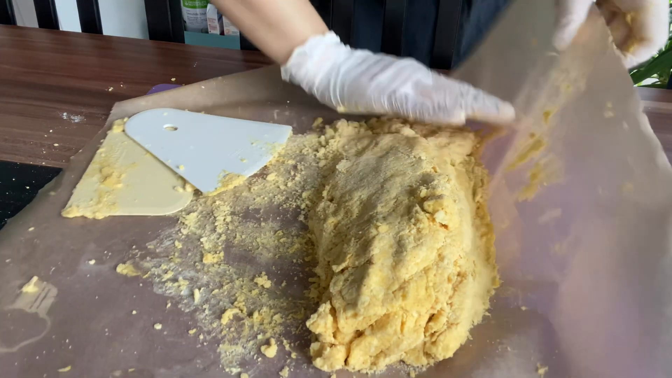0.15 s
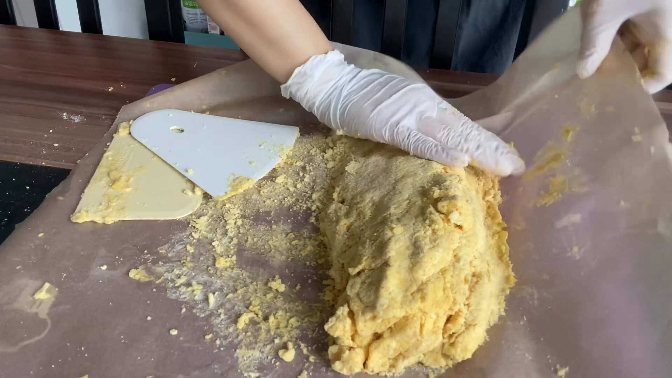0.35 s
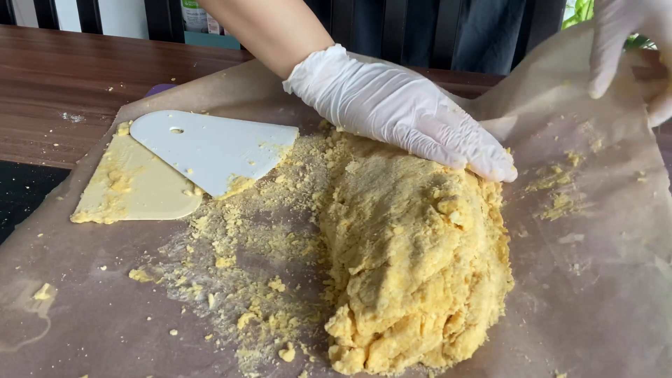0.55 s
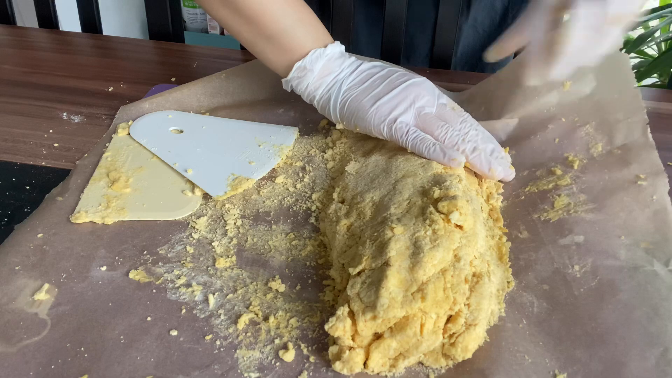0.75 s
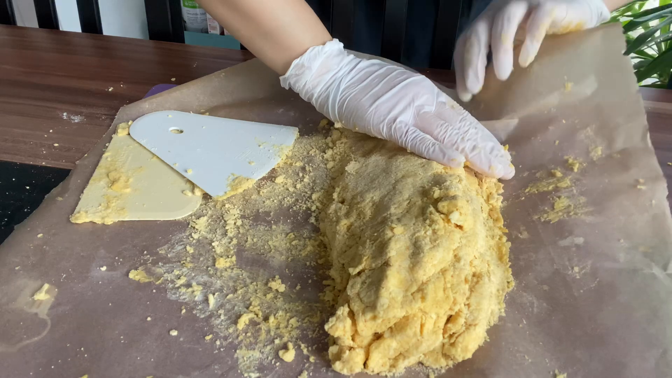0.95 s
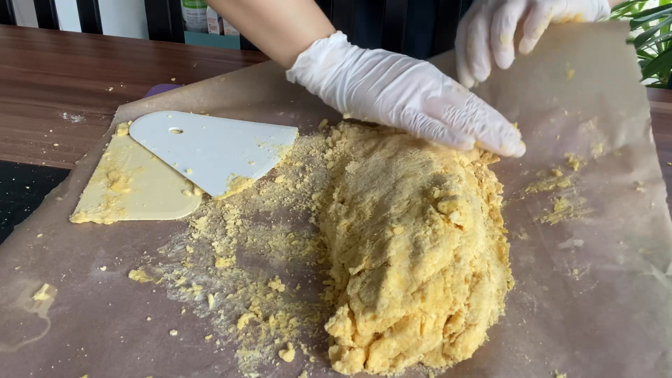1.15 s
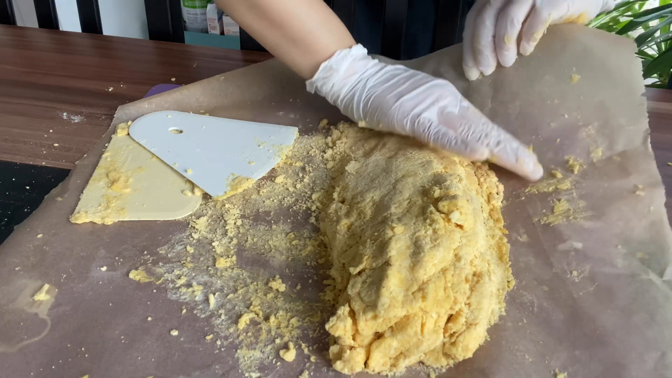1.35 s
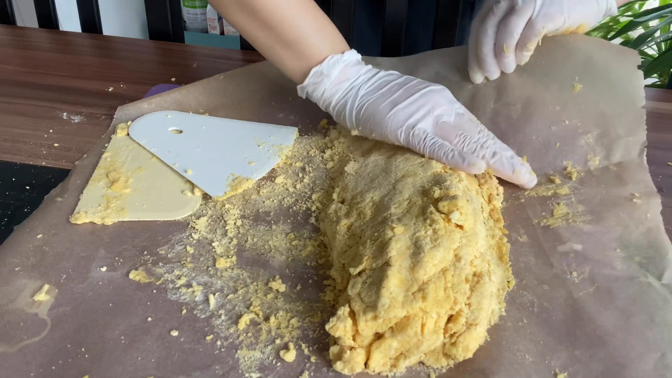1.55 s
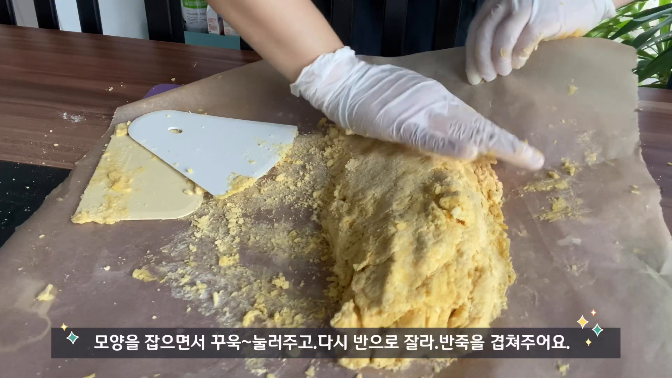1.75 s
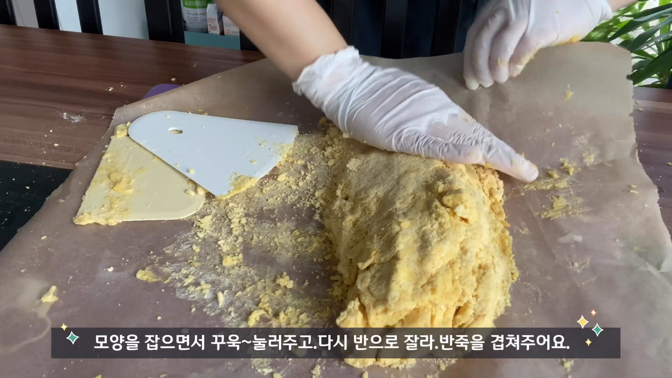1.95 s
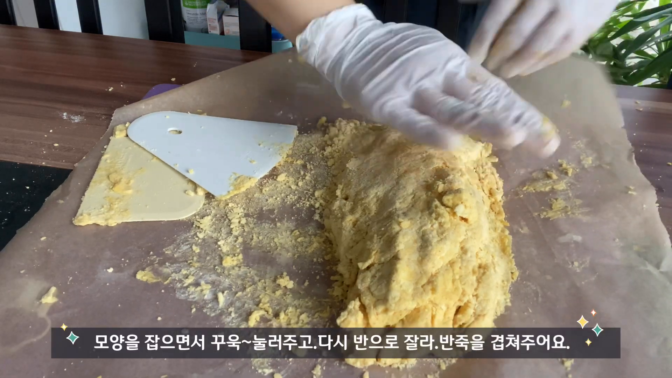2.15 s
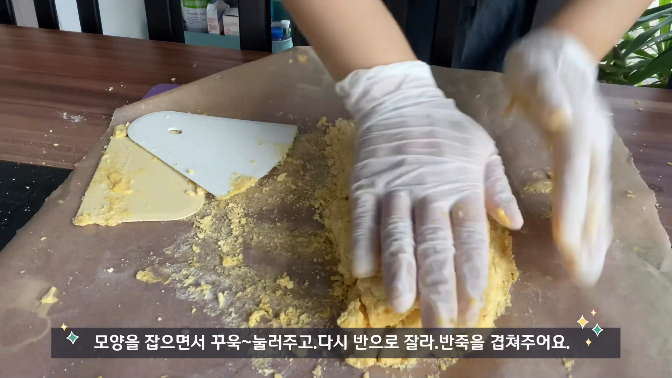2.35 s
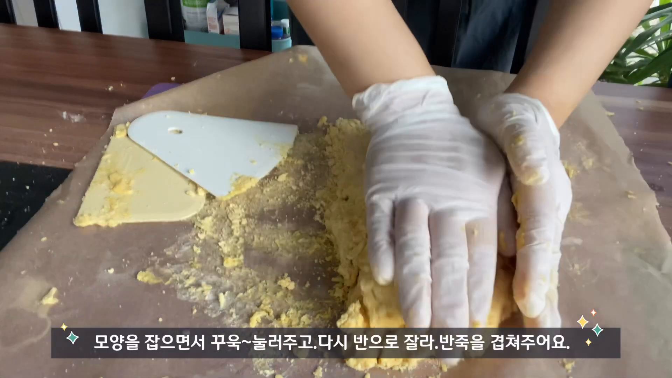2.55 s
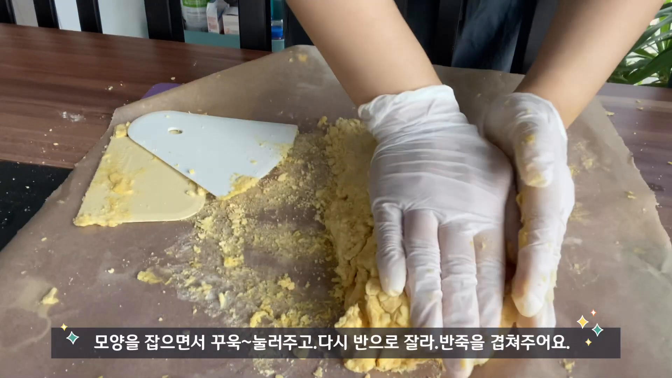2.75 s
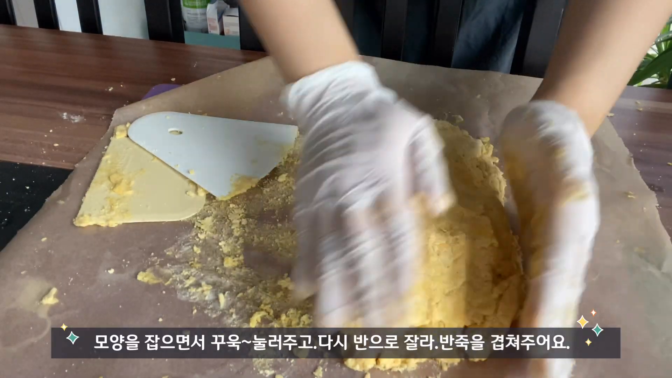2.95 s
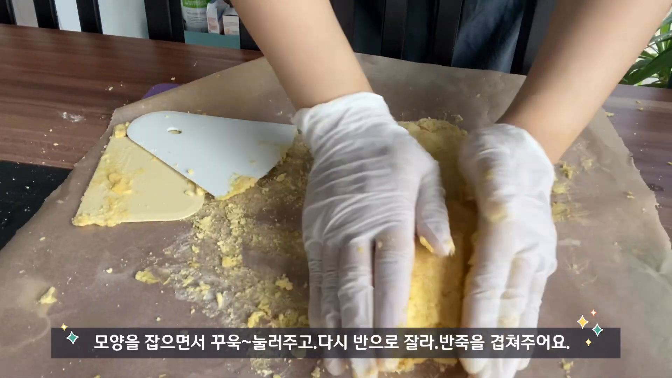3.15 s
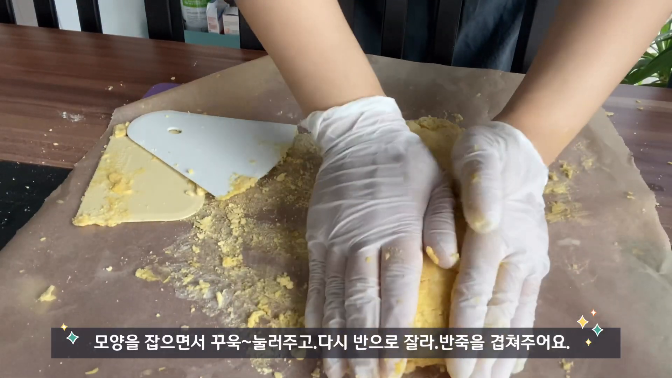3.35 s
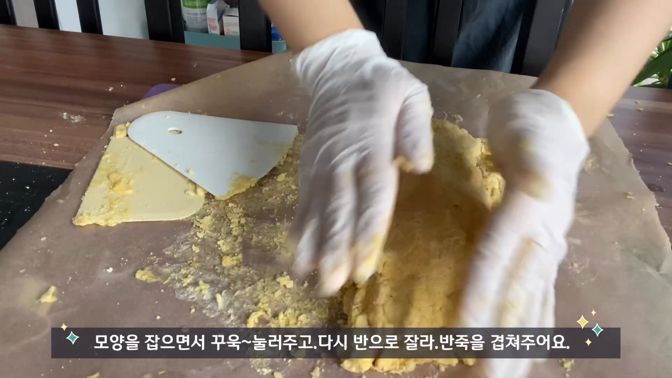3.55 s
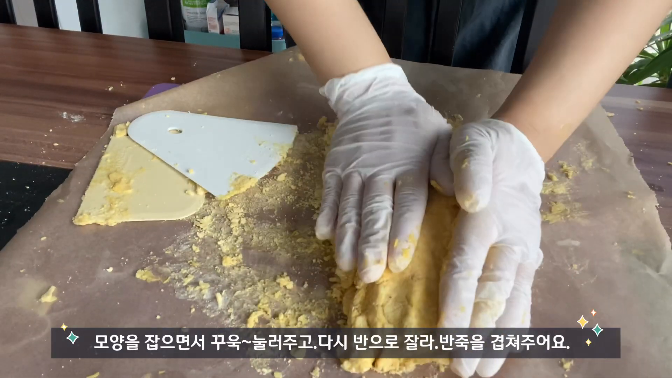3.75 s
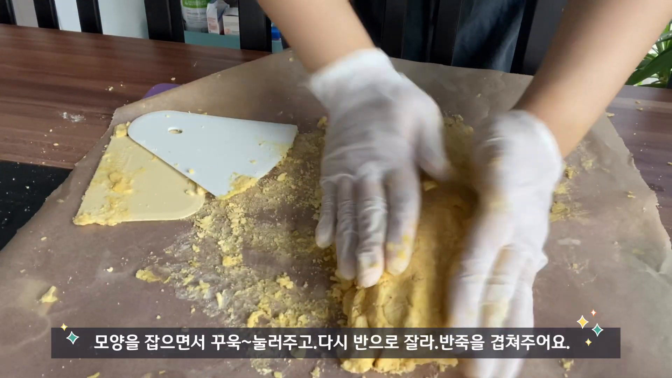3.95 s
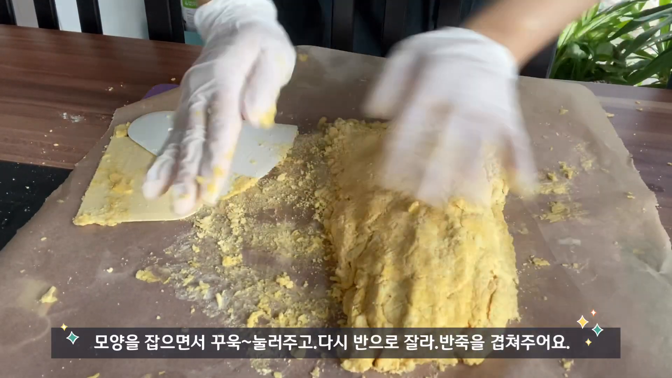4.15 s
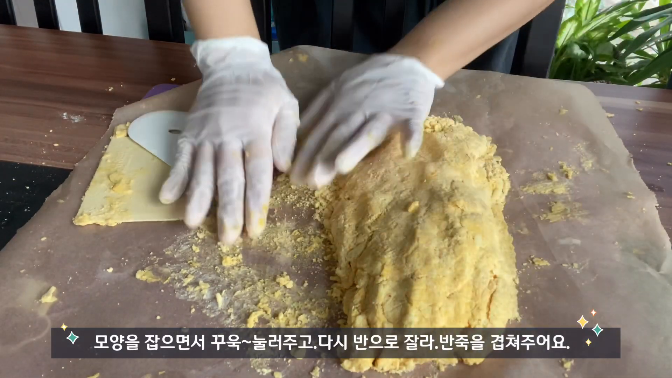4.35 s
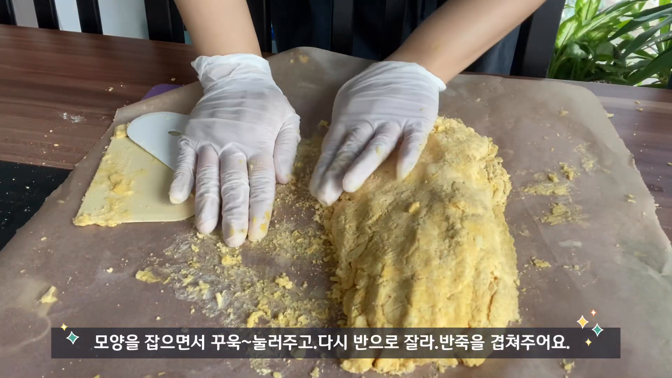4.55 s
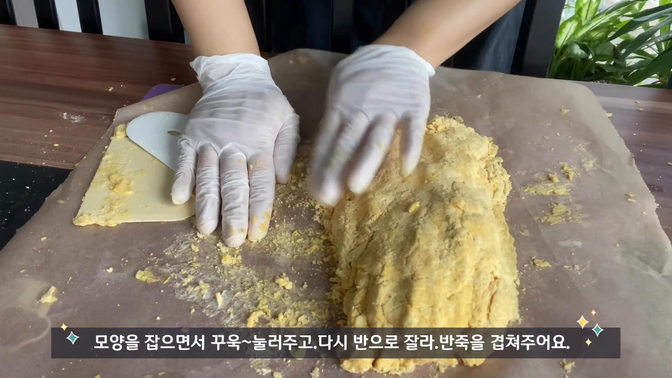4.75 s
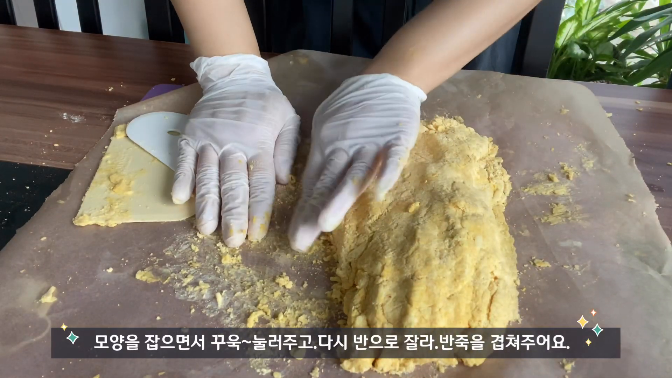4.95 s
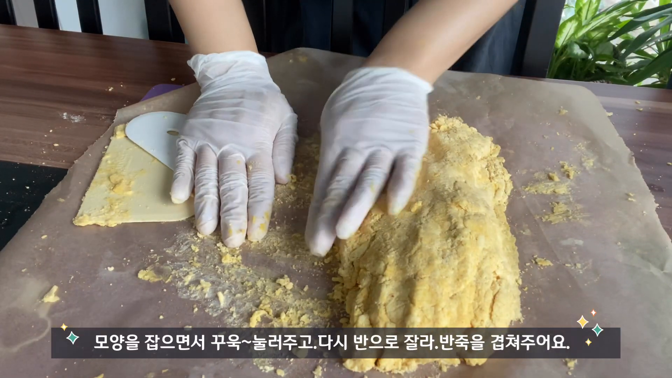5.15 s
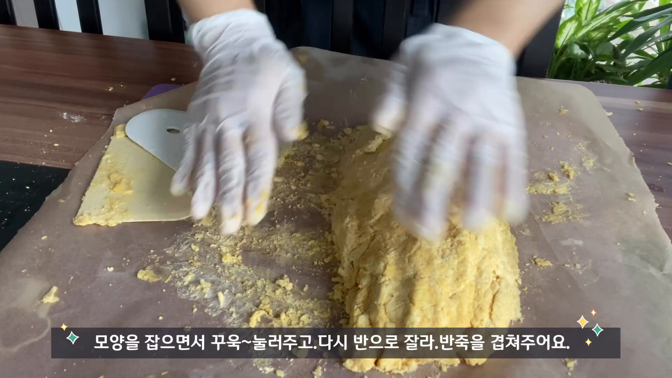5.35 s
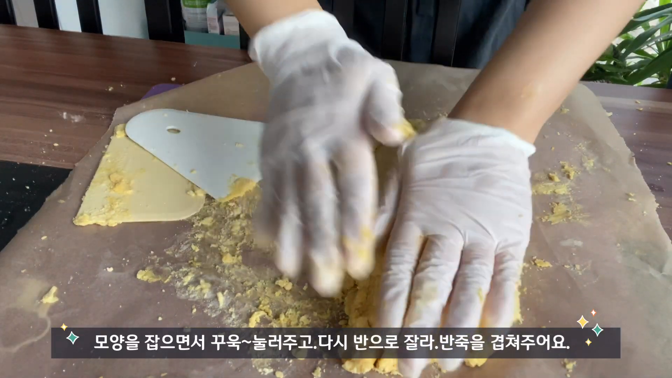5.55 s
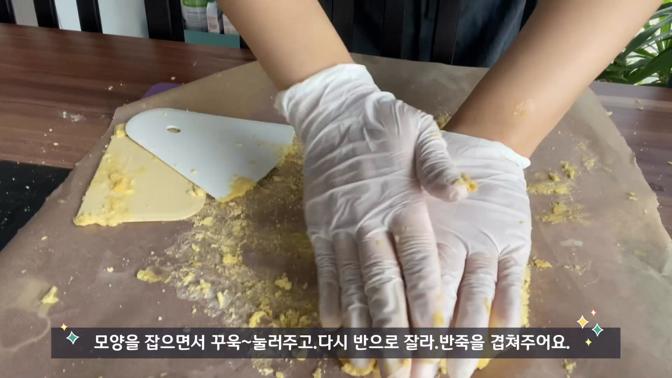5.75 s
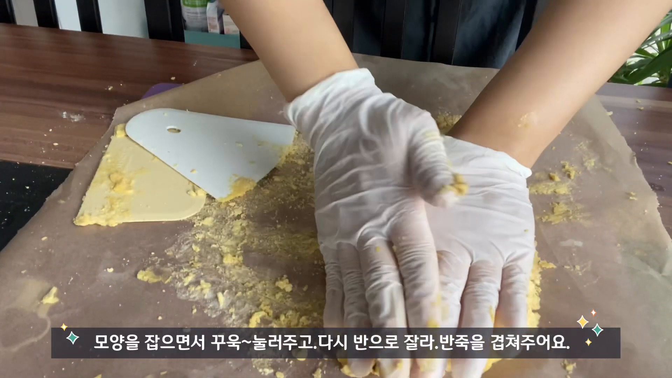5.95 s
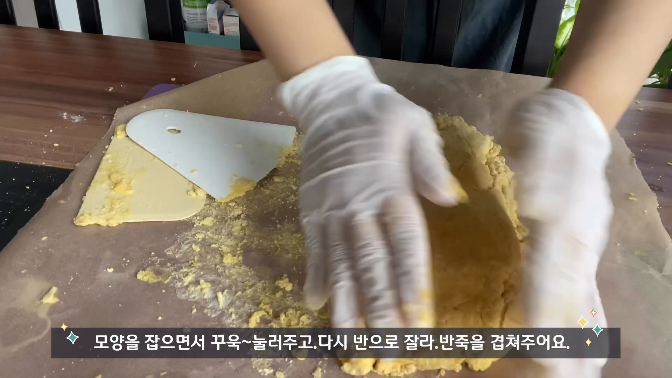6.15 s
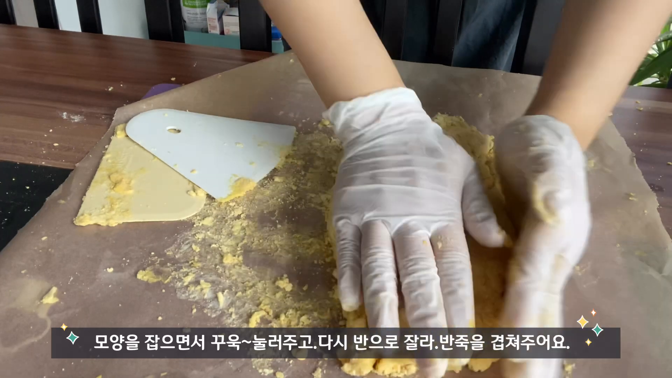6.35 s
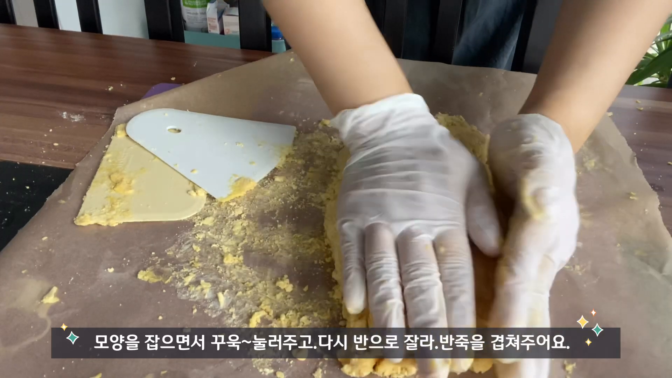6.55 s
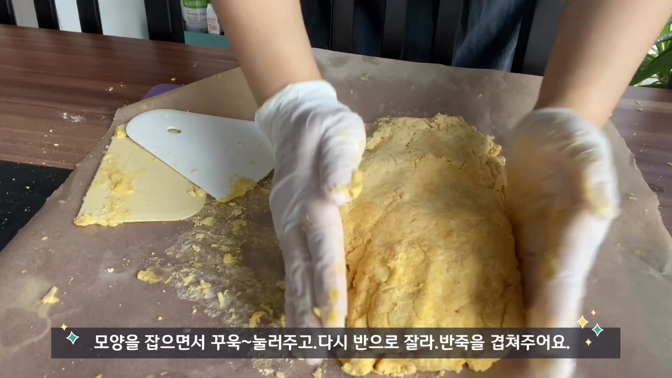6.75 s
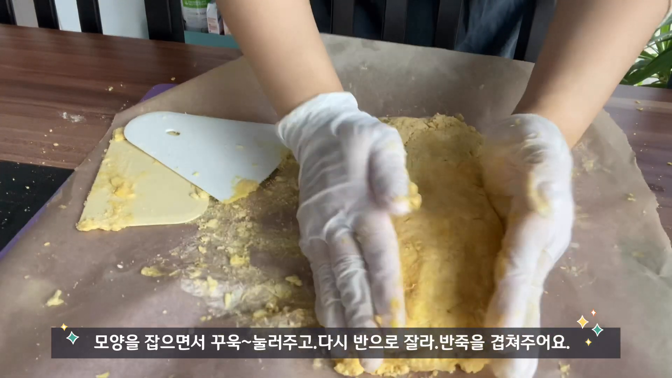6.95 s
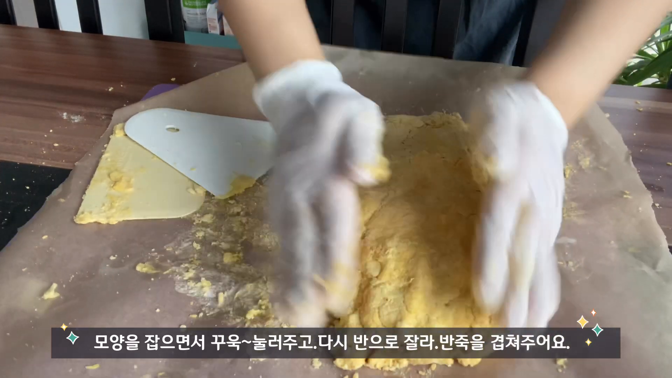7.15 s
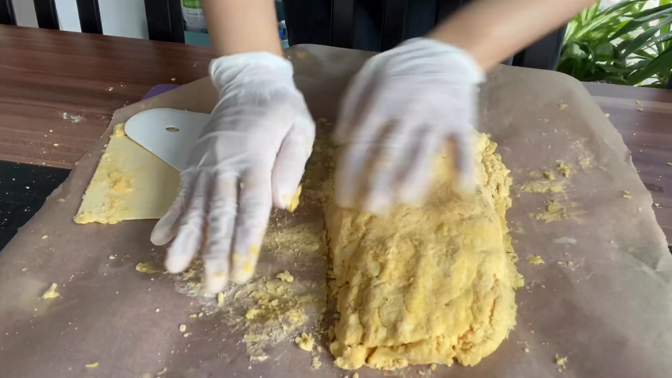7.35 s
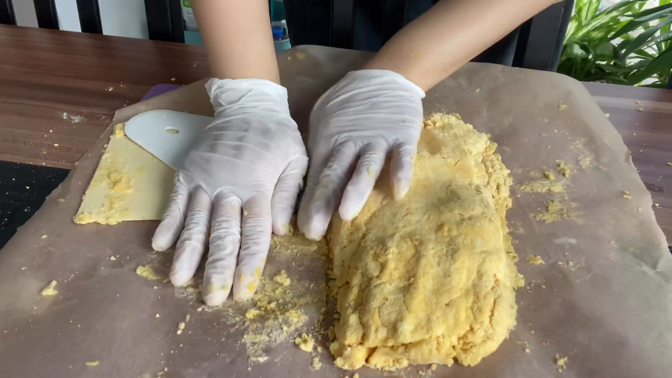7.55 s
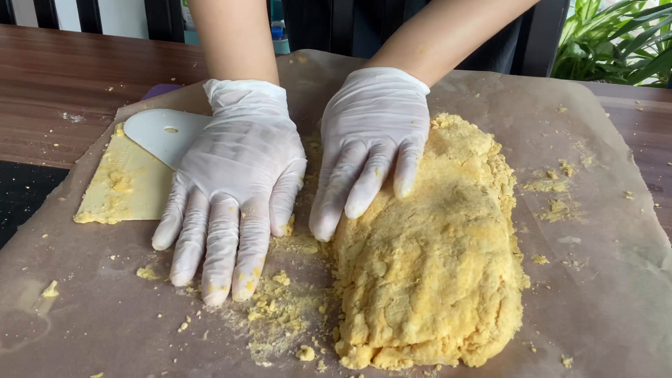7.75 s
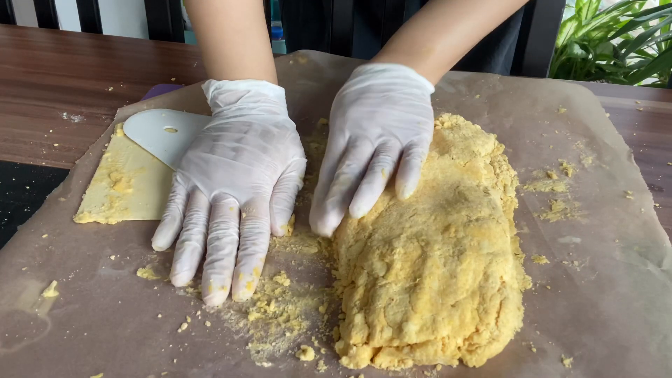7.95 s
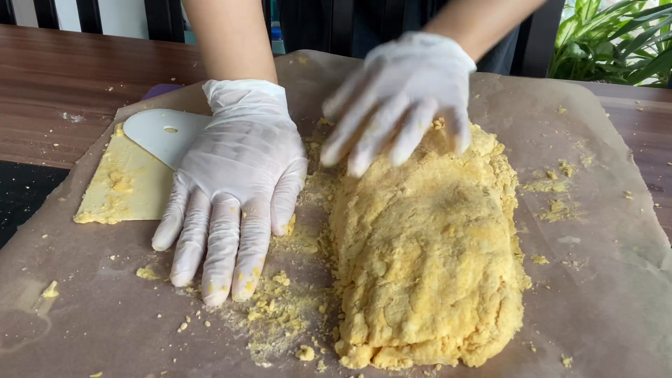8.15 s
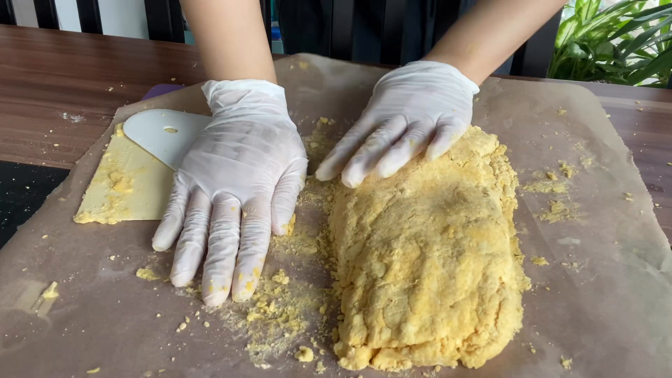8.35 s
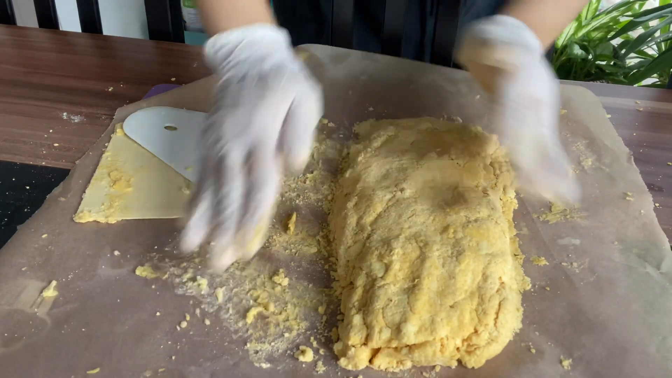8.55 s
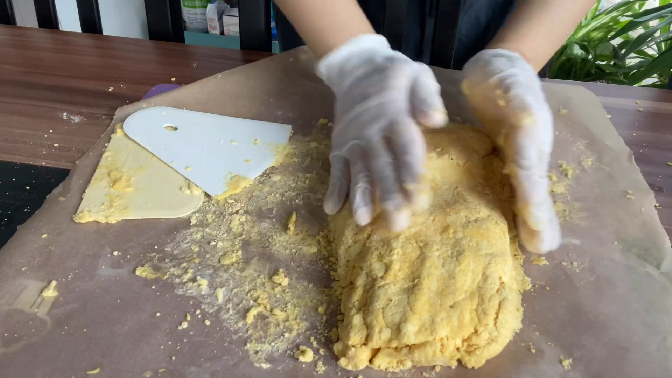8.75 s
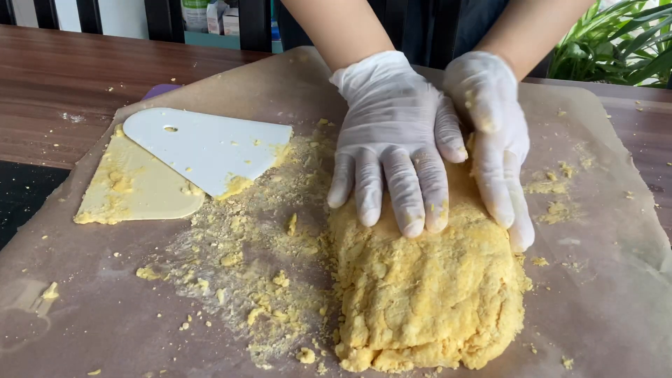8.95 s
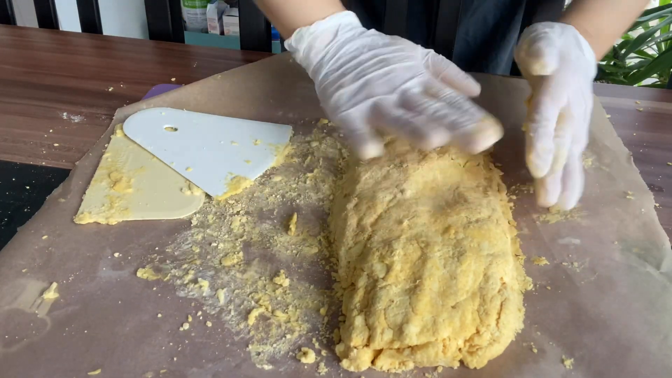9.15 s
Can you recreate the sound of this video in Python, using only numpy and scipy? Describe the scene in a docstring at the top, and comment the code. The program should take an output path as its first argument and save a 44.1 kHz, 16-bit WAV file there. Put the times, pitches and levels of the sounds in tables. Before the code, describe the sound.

Gloved hands handle crisp paper on a kitchen worktop, recorded close with a phone. The opening two seconds are busy and loud, full of crinkles and buckling cracks over dull pushes. Afterwards come separate, softer, brighter rubs and tiny clicks with gentle thumps, interrupted by a few sharp crackles late on. Faint fan rumble with wavering low tones continues throughout, and the room adds a short diffuse reverberation.

```python
"""A dense papery rustle broken by loud snaps: gloved hands lift and smooth baking paper on a kitchen worktop.
Buckling creases are sums of tiny band-passed clicks; a table of swells and fades sets the rustle level.
Soft pushes on the worktop add low thuds as short decaying swings, and hard walls add a diffuse tail.
Behind them a fan gives shaped noise and wandering tones; a phone picks it all up at two ports."""
import sys
import numpy as np
from scipy import signal
from scipy.fft import rfft, irfft, next_fast_len
from scipy.io import wavfile
from scipy.ndimage import uniform_filter1d

SR = 44100
rng = np.random.default_rng(int(sys.argv[2]) if len(sys.argv) > 2 else 0)


def int16_out(signal):
    """Quantize to a 16-bit WAV file."""
    q = np.round(np.clip(np.atleast_2d(signal).T, -1, 1) * 32767)
    wavfile.write(sys.argv[1], SR, q.astype(np.int16))


N = 405279

# colour of the rustle, fuller for the lifted sheet, thinner for gloves:
# [t/s, body under 3.8 kHz/dB, sheen over 5.5 kHz/dB], both weighted by frequency
RUSTLE_COLOUR = [(0, -1, -9), (.8, 3.5, 0.5), (1.5, 2.5, -10.5), (2.05, 1, -8.5), (2.4, -9.5, -1.5),
                 (3.4, -4, -4.5), (4.2, -5.5, -5.5), (4.5, 1.5, -9), (5.2, -0.5, -7.5), (6.0, -5, -7),
                 (6.5, -5, -4.5), (6.82, -6, -7.5), (7.3, 0.5, -5), (7.55, -6, -5.5), (8.02, 9, -12),
                 (8.11, 19.5, -28), (8.2, 1, -13), (8.7, -1, -2.5), (9.2, 1, -2.5)]


def rustle(per_s=6000, scatter_db=2.5, flurry_db=2.0):
    """Crackling noise: a dense random train of small cracks, a few larger, coming in flurries."""
    time_draw, sign_draw, size_draw = rng.random((int(per_s * N / SR), 3)).T
    s = time_draw * N / SR
    db = stir_db(s)
    flurry = (walk(45) + walk(160))[(s * SR).astype(int)]
    large_db = np.minimum(-scatter_db * np.log(size_draw), 12.0)
    size = np.sign(sign_draw - .5) * undb(db + flurry_db * flurry + large_db)
    body_db, sheen_db = curve(RUSTLE_COLOUR, s)
    return cracks(s, size, body_db, sheen_db, 0.56, spread=4.4, colour_db=4.0)


def stir_db(s):
    """Energy addition: swells, fades and a settling tail after each peak sum as powers to one rustle level."""
    # swells and fades of the rustle; a long rub may take two rows:
    # [loudest t/s, level/dB, swell over 20 dB/s, fade over 20 dB/s]
    swells = [(0.0, -27, .1, 0.094), (.16, -34, 0.46, 0.33), (0.322, -35.5, 0.021, 0.07),
              (0.489, -40, 0.49, 0.057), (.68, -49.5, 0.096, 0.021), (.78, -53, 0.027, 0.07),
              (.935, -42.5, 0.036, 0.63), (1.121, -29.5, 0.053, 0.077), (1.28, -38, 0.37, 0.11),
              (1.409, -38, 0.05, 0.18), (1.64, -53, 0.16, 0.89), (1.739, -43, 0.058, 0.18),
              (1.986, -37, 0.082, 0.11), (2.19, -57.5, 0.99, 0.03), (2.335, -42.5, 0.013, 0.3),
              (2.68, -56, 0.015, 0.032), (2.799, -52.5, 0.17, 0.12), (2.967, -46.5, 0.067, 0.3),
              (3.16, -49.5, 0.18, 0.029), (3.36, -54, 0.1, 0.63), (3.45, -54, 0.12, 0.058),
              (3.52, -62, .2, 0.21), (3.96, -45.5, 0.059, 0.061), (4.29, -42.5, 0.0059, 0.23),
              (4.45, -48, 0.07, 0.071), (4.648, -47, 0.045, 0.077), (4.98, -53.5, 0.14, 0.15),
              (5.209, -50, 0.15, 0.055), (5.45, -57, 0.048, 0.069), (5.75, -58.5, 0.45, 0.52),
              (6.03, -55.5, 0.08, 0.041), (6.18, -50.5, 0.014, 0.11), (6.24, -44, 0.06, 0.14),
              (6.57, -50, 0.087, 0.04), (6.818, -35, 0.069, 0.13), (7.05, -46.5, 0.048, 0.15),
              (7.359, -47.5, 0.015, 0.13), (7.559, -39, 0.072, 0.077), (7.639, -60, .1, 0.26),
              (8.1, -69, 0.022, 0.19), (8.228, -43.5, 0.046, 0.1), (8.44, -52.5, 0.32, 0.071),
              (8.672, -50, 0.042, 0.24), (8.78, -58.5, 0.61, 0.13), (9.01, -60, 0.095, 0.048), ]
    settle_db, settle_s = -19, 0.36  # paper settling: level under the row's peak, time to fade 20 dB
    t = np.arange(0, N / SR + .01, .002)
    at, db, swell, fade = np.transpose(swells)[:, :, None]
    late = t - at
    stroke = undb(db - 20 * np.where(late < 0, -late / swell, late / fade))
    settle = (late > 0) * undb(db + settle_db - 20 * late / settle_s)
    power = np.sum(stroke ** 2 + settle ** 2, axis=0)
    return np.interp(s, t, 10 * np.log10(power))


def snaps(table, t60=.017, count=110, lead_s=.003, lead_db=22, give_db=-0.5, swarm_db=-8.0, thin_db=-4):
    """Buckling avalanche: a fold creaks up for a moment, gives way, and its swarm of cracks dies out."""
    s, db, body_db, sheen_db = (np.repeat(c, count) for c in np.transpose(table))
    time_draw, sign_draw = rng.random((len(s), 2)).T
    late = (.6 * t60 + lead_s) * time_draw - lead_s
    late[::count] = 0  # one crack at the moment of giving way has its own level
    db = db + np.where(late == 0, give_db, swarm_db)
    fall_db = np.where(late < 0, -lead_db * late / lead_s, 60 * late / t60)
    size = np.sign(sign_draw - .5) * undb(db - fall_db)
    return cracks(s + .0015 + late, size, body_db, sheen_db, 1.0, spread=1.0, colour_db=0.5, bass_db=thin_db)


def ticks(per_s=60, over_db=15.0, scatter_db=3.0):
    """Random buckling: small creases give way at chance times, their level following the rustle."""
    time_draw, size_draw = rng.random((int(per_s * N / SR), 2)).T
    s = time_draw * N / SR
    body_db, sheen_db = curve(RUSTLE_COLOUR, s)
    large_db = np.minimum(-scatter_db * np.log(size_draw), 5.0)
    tick_db = stir_db(s) + over_db + large_db
    table = np.transpose([s, tick_db, body_db - 3.5, sheen_db])
    return snaps(table, t60=.009, count=40, give_db=-12.0)


def cracks(s, size, body_db, sheen_db, pan_db, spread, colour_db, bass_db=0, patchy_db=2.4):
    """Impulse response: each click excites a bank of bands, with its own colour, delay and level at two ports."""
    # where the busy hand is: [t/s, lag of left port behind right/samples]
    hand = [(0, 2), (1.4, -1), (2, 2), (3.9, 5.5), (4.2, -4.5), (5.3, -9.5), (5.6, 1.5), (6.3, 1.5),
            (6.6, -10), (8.2, -5), (8.6, 1.5), (9.2, -2)]
    # colour of one crack, before the scaling by band frequency: [f/Hz, level/dB]
    crack_bands = [(180, -4.5), (350, -5.5), (750, -3.5), (1450, 3), (2300, 7), (3800, 8.5), (6000, 7),
                   (9000, 12.5), (13500, -2)]
    chance = rng.standard_normal((len(s), len(crack_bands) + 1)).T
    place = chance[-1]  # sideways place on the sheet
    lag = curve(hand, s)[0] + spread * place
    sides = (1, -1)  # left, right
    arrivals = [np.clip(s * SR + side * lag / 2, 0, N - 1).astype(int) for side in sides]
    out = 0
    for k, ((hz, db), own) in enumerate(zip(crack_bands, chance)):
        low = np.clip(0.53 * np.log2(3800 / hz), 0, 0.9)
        high = np.clip(np.log2(hz / 5500), 0, 1)
        patch_db = patchy_db * walk(50)[arrivals[0]]  # each patch of the sheet favours other bands
        tint_db = low * body_db + high * sheen_db + colour_db * own
        gain = size * undb(db + tint_db + patch_db + bass_db * (hz < 1000))
        balance_db = pan_db + 5.87 * (hz < 1000) * place  # left over right
        train = [np.bincount(i, gain * undb(side * balance_db / 2), N) for i, side in zip(arrivals, sides)]
        # neighbouring bands alternate in sign
        out = out + (-1) ** k * band(np.array(train), hz, 0.73 * hz) / np.sqrt(hz / 3000)
    return out


def thuds(t60=0.12, rise_s=0.0043):
    """Damped vibration: the worktop answers a soft push with a short low swing and an upper partial."""
    # palms pushing on the worktop: [t/s, level of the decay at its start/dB, f/Hz]
    pushes = [(0.298, -46, 143), (0.809, -37.5, 107), (0.951, -38.5, 103.6), (1.054, -33, 99),
              (1.393, -45, 175), (1.524, -40.5, 153), (1.754, -43, 160), (1.974, -42, 108.4),
              (3.596, -40.5, 72.4), (3.984, -42, 90), (4.307, -40, 95), (4.843, -38.5, 162),
              (5.44, -42, 100.4), (5.602, -39, 58), (6.252, -40.5, 90), (6.82, -40, 57.6), (7.35, -37, 108),
              (8.1, -43, 111), (8.18, -37, 70), (8.339, -39.5, 79.5)]
    out = np.zeros(N + SR)
    t = np.arange(SR // 3) / SR
    for s, db, hz in pushes:
        swing = np.sin(2 * np.pi * hz * t) + 0.52 * np.sin(2 * np.pi * 1.73 * hz * t)
        i = int(s * SR)
        out[i:i + len(t)] += undb(db - 60 * t / t60) * (1 - np.exp(-t / rise_s)) * swing
    return out[:N]


def kitchen(x, t60=0.13, tail_db=-11):
    """Reverberation: hard walls return a short, diffuse, exponentially decaying tail, different at each port."""
    t = np.arange(SR // 2) / SR
    tail = rng.standard_normal((2, len(t))) * undb(-60 * t / t60) * np.clip(t / 0.0048, 0, 1)
    tail = signal.lfilter([.6], [1, -.4], tail)  # soften the treble
    tail = tail * undb(tail_db) / np.sqrt(np.sum(tail ** 2, axis=1, keepdims=True))
    return x + signal.fftconvolve(x, tail, axes=1)[:, :N]


def fan(side_db=-1.0, side_hz=200):
    """Broadband and tonal noise: a shaped rumble, alike at both ports in the deep bass, and wandering tones."""
    # rumble, relative spectrum: [f/Hz, level per Hz/dB]
    rumble = [(18, -31), (35, -5), (64, -2.5), (110, -10.5), (190, -10), (300, -14), (450, -25.5),
              (800, -30.5), (2000, -39), (6000, -42.5), (15000, -46)]
    # tones: [f/Hz, wander (twice its spread)/Hz, mean level before tilt and drone/dB]
    hum = [(50, 4.44, -61), (117.8, 4, -61.5), (146, 1.3, -67.5), (192.4, 3.9, -68), (245.4, 2.07, -63.5),
           (265, 1.46, -59), (402, 3.5, -73.5)]
    # the second tone drones louder for a while: [from t/s, to t/s, rise/dB]
    drone = (1.95, 3.2, 5.2)
    hz = np.maximum(np.arange(N // 2 + 1) * SR / N, 1)
    rumble_hz, rumble_db = np.transpose(rumble)
    shape = undb(np.interp(np.log(hz), np.log(rumble_hz), rumble_db))
    noise = irfft(rfft(rng.standard_normal((2, N))) * shape, N)
    mid, side = level(noise, -57.5)
    high_pass = signal.butter(1, side_hz, "highpass", fs=SR, output="sos")
    side = undb(side_db) * signal.sosfilt(high_pass, side)
    t = np.arange(N) / SR
    drone_db = drone[2] * uniform_filter1d(1. * (t > drone[0]) * (t < drone[1]), SR // 5)
    tones = 0
    for f, wander, db in hum:
        tilt_db = (f > side_hz) * np.array([[1.5], [-1.5]])
        tone_db = db + drone_db * (f == hum[1][0]) + .7 * walk(8.2) + tilt_db
        phase = 2 * np.pi * np.cumsum(f + wander / 2 * walk(12)) / SR
        tones = tones + undb(tone_db) * np.sin(phase)
    return undb([[.6], [-.6]]) * (mid + tones + side * np.array([[1], [-1]]))


def undb(db):
    """Logarithmic level: decibels to amplitude gain."""
    return 10 ** (np.asarray(db) / 20)


def level(x, db):
    """Root mean square: scale a signal to an rms level."""
    return x * undb(db) / np.sqrt(np.mean(x ** 2))


def curve(table, s):
    """Linear interpolation: columns of a table read at times s."""
    t, *columns = np.transpose(table)
    return [np.interp(s, t, c) for c in columns]


def band(x, hz, width):
    """Resonance: causal band-pass, centre and width in Hz."""
    return signal.sosfilt(signal.butter(2, [hz - width / 2, hz + width / 2], "bandpass", fs=SR, output="sos"), x)


def walk(rate):
    """Slow random modulation: random levels held 1 / rate s and slewed; spread near 1."""
    k = int(SR / rate)
    held = np.repeat(rng.standard_normal(N // k + 1), k)
    return 1.315 * uniform_filter1d(held, k)[:N]


def scene():
    """Superposition: hands and paper reverberate in the kitchen, over the fan."""
    # creases that snap: [t/s, level before colouring/dB, body/dB, sheen/dB]
    creases = [(0.005, -20, 0, -7), (0.012, -23, 1, -10), (0.104, -13, -3, -3), (0.1384, -14, -11, 2),
               (0.1474, -9.5, 1, -6), (0.1594, -16, -11, 3), (0.2044, -14, -2, -3), (0.258, -14, 1, -17),
               (0.2915, -16, 5, 7), (0.306, -9, -13, 0), (0.326, -18, -11, -4), (0.363, -18.5, -7, 1),
               (0.404, -18.5, -5, -15), (0.4375, -32, 3, -10), (0.4963, -23.5, 0, -12),
               (0.7253, -37, 7, -20), (0.92, -27, 1, -8), (0.9448, -17, -26, -10.5), (0.9766, -20, -5, -11),
               (1.053, -13.5, 3, 0), (1.0865, -17, -18, -7), (1.1, -11.5, 2, -6), (1.122, -20, 0, -17),
               (1.133, -24, 0, -18), (1.2135, -27, -16, -14), (1.2231, -17, 1, -3), (1.274, -18, 1, -3),
               (1.346, -29, 4, -19), (1.372, -27, 0, -21), (1.4013, -1, 1.5, -7.5), (1.407, -8.5, -15, -5),
               (1.532, -26, 10, -3), (1.6362, -14.5, -6, -16), (1.7414, -18, 0.5, 0),
               (1.849, -34, 16.5, -12), (1.956, -26, -2, -9), (1.978, -24.5, 2, -5), (2.0823, -26, -27, -4),
               (2.1767, -22, -36, -8.5), (2.6746, -24.5, -19, -3), (2.78, -30.5, 0, -24),
               (2.9755, -37, -19, 4), (3.0806, -22.5, -18, -5), (3.1145, -25.5, -5, 8),
               (3.1528, -13.5, -34, -2), (3.253, -30, -33, -1), (3.2757, -26, -27, -2),
               (3.3738, -14, -17, -21), (3.4336, -20, -22, -11), (3.452, -23, -18, -11),
               (3.494, -43, -19, -5), (3.5047, -13.5, -16, 1), (3.512, -23, -19, -12),
               (3.7452, -32.5, -12, -46), (3.9554, -20, -26, 1), (3.966, -31, -15, 0), (3.979, -29, -9, -4),
               (4.0855, -44.5, -11.5, 4), (4.293, -25, -0.5, 4), (4.4363, -33.5, -14, 1),
               (4.975, -28.5, -23, 6.5), (5.0232, -22.5, -8, -10), (5.059, -32, -4, -34),
               (5.3415, -37, -6.5, -1), (5.361, -36.5, -14.5, -3), (5.458, -34.5, -9, -18),
               (5.737, -34, -15, -2), (5.8325, -33, -17, -28), (5.9574, -33.5, -29, -10),
               (5.988, -42, -21, -8), (6.1154, -35, -3, -10), (6.1789, -27, -10, -16),
               (6.226, -20.5, -16, 0.5), (6.2414, -20.5, -31, 1), (6.3145, -30.5, -3, 1),
               (6.3887, -34.5, -7, -11.5), (6.556, -36, -9, -4), (6.595, -38.5, 7, -16),
               (6.7088, -32, 5, -7.5), (6.7934, -16, -34, -11), (6.806, -15, -29, -1),
               (6.8226, -3.5, -16.5, -1.5), (6.9186, -21, -12, -17), (7.0945, -17.5, -20, -9),
               (7.099, -19, -18.5, -13), (7.3582, -29.5, -13, -7), (7.3696, -27, -20, -3),
               (7.4295, -20.5, -17, -3), (7.434, -17.5, -15, -7), (7.481, -28, 4, -11),
               (7.5455, -17, -24, -7), (7.5565, -10, -13, -12), (7.64, -28.5, -25, 0.5),
               (7.728, -37.5, -2, -18), (7.965, -31, -6, -15), (8.1964, -26.5, -1.5, -13.5),
               (8.216, -17.5, -7, -8), (8.3663, -40, 15, 10), (8.672, -25.5, -17, -9.5),
               (9.131, -44, 10, -17), (9.156, -42.5, 3, -14)]
    return kitchen(rustle() + ticks() + snaps(creases) + thuds()) + fan()


def record(dry):
    """Stereo crossover: two ports below the split; above it the left mostly feeds both sides, phase-shifted."""
    # phase by which the left channel leads in the treble: [f/Hz, phase/rad]
    port_phase = [(6000, 0.0), (7500, -0.1), (9500, -2.9), (10900, -3.4), (12000, -6.1), (13800, -6.3),
                  (14700, -9.2), (16200, -9.45)]
    split_hz, top_hz = 6970, 16300
    size = next_fast_len(N + 4096)
    hz = np.arange(size // 2 + 1) * SR / size
    left, right = rfft(dry, size)
    share = 1 / (1 + (split_hz / np.maximum(hz, 1)) ** 12)  # 0 in the bass, 1 in the treble
    shifted = left * np.exp(-1j * np.interp(hz, *np.transpose(port_phase)))
    treble = 0.92 * shifted + 0.22 * right
    right = np.sqrt(1 - share) * right + np.sqrt(share) * treble
    pair = irfft(np.array([left, right]), size)[:, :N]
    return signal.sosfilt(signal.ellip(10, .2, 80, top_hz, fs=SR, output="sos"), pair)


dry = scene()
out = record(dry)
int16_out(out)
```